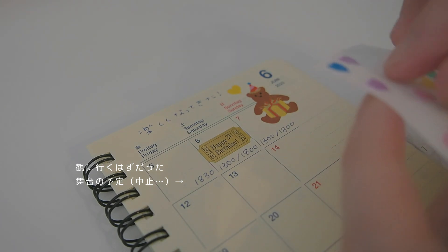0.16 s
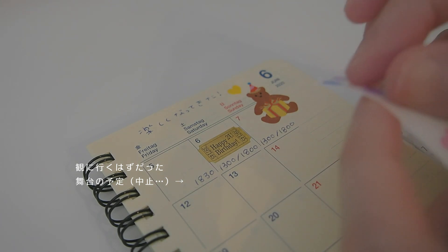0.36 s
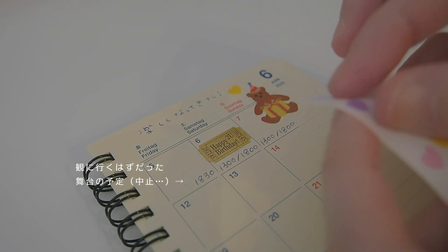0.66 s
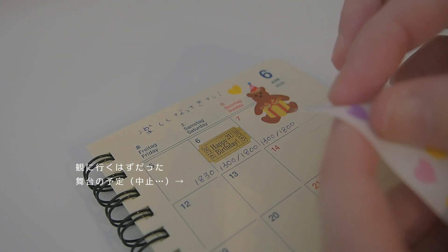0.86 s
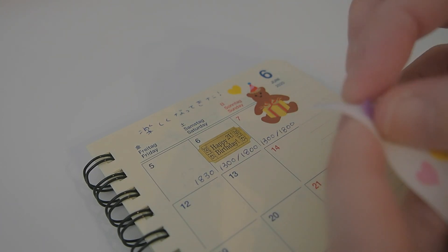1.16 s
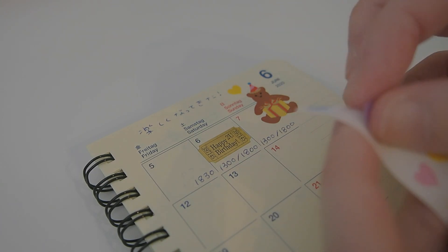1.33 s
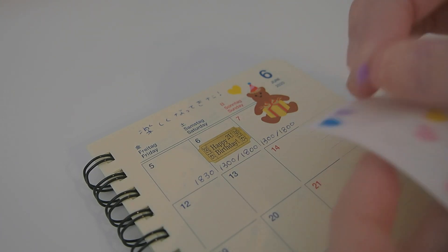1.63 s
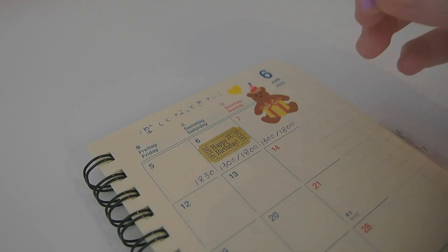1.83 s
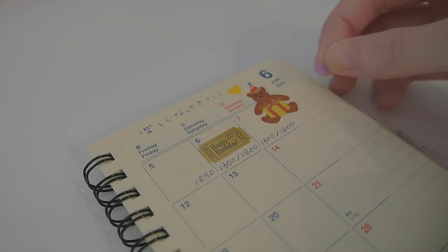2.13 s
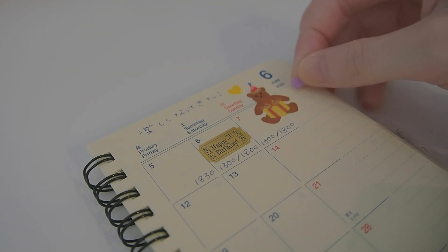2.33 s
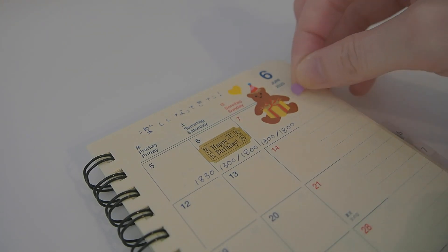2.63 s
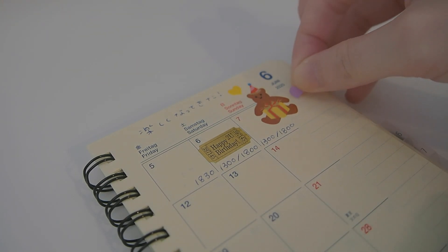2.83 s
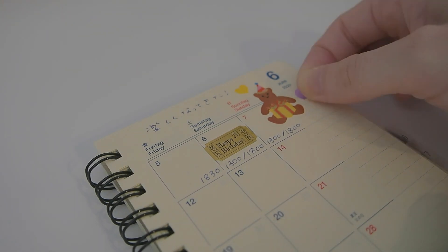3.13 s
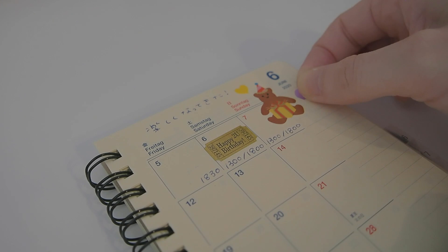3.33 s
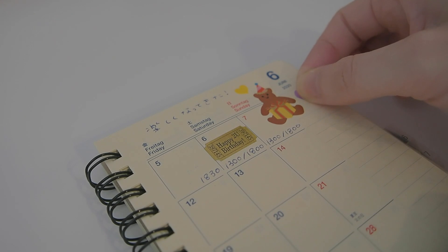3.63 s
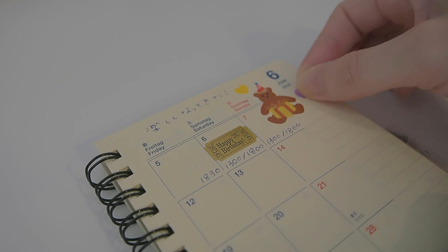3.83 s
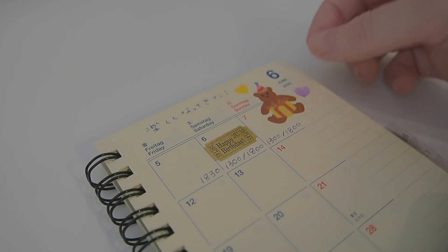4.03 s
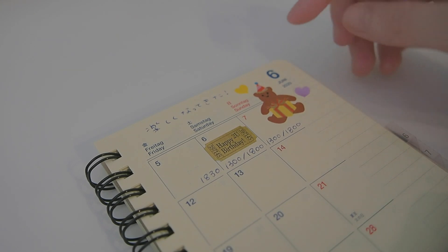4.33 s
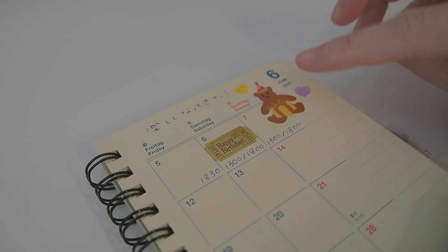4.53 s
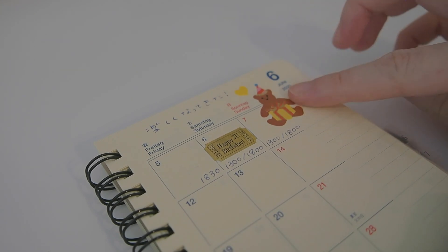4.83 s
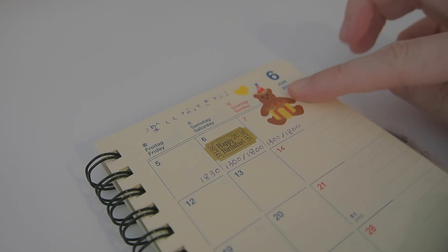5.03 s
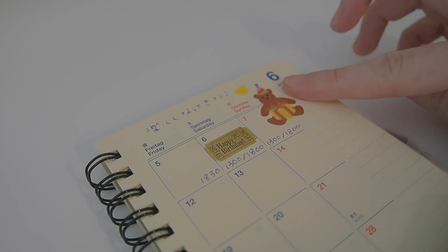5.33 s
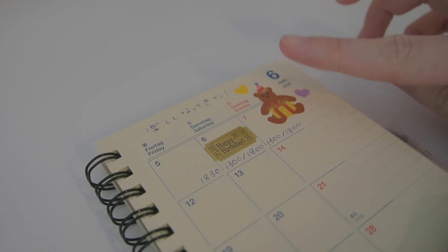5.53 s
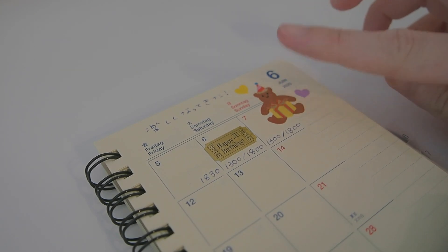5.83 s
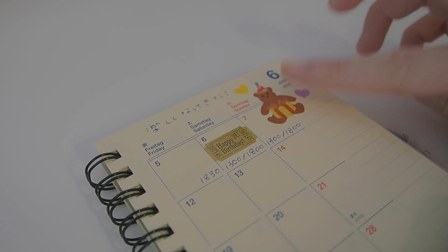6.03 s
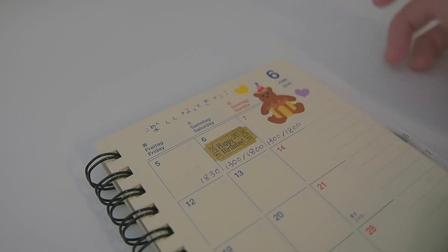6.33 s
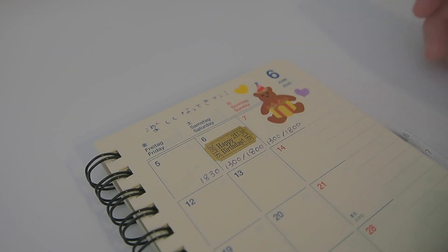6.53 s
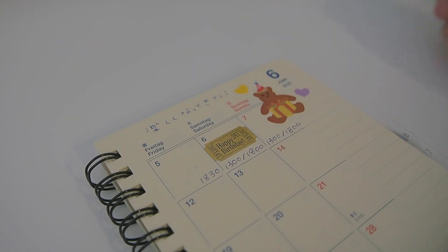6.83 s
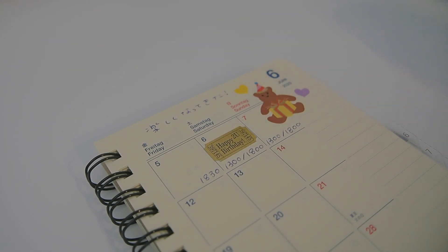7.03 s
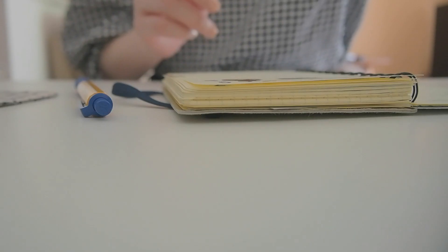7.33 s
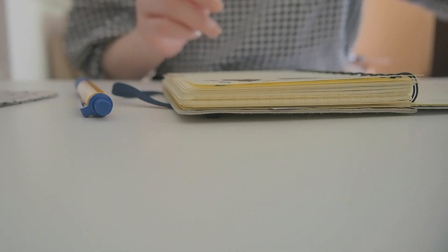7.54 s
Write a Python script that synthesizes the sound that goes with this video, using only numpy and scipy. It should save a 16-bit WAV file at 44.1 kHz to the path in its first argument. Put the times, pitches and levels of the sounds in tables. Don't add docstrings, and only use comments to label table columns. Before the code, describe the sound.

A finger rubs paper over soft desk thuds, a sticker snaps loose with one loud crack, then light page taps and a closing book scrape.

```python
import sys
import numpy as np
from scipy import signal
from scipy.fft import rfft, irfft, next_fast_len
from scipy.io import wavfile
from scipy.ndimage import uniform_filter1d

SR = 44100
rng = np.random.default_rng(int(sys.argv[2]) if len(sys.argv) > 2 else 0)


def ratio(d):
    e = np.asarray(d, float) / 20
    return 10 ** e


def transcribe(signal):
    frames = np.atleast_2d(signal).T
    limited = np.clip(frames, -1, 1)
    pcm = np.round(limited * 32767).astype(np.int16)
    wavfile.write(sys.argv[1], SR, pcm)


N = 338247
M = next_fast_len(N)
HZ = np.fft.rfftfreq(M, 1 / SR)
T = np.arange(N) / SR
TOP_HZ = 15880


def unit(x):
    return x / np.sqrt(np.mean(x ** 2))


def along(table):
    f, v = np.transpose(table)
    return np.interp(np.log(HZ + 1), np.log(f), v)


def shape(x, gain):
    return irfft(rfft(x, M) * gain, M)[..., :N]


def colour(x, table):
    inside = (HZ >= table[0][0]) * (HZ <= min(table[-1][0], TOP_HZ))
    return shape(x, ratio(along(table)) * inside)


def thin(x, hz):
    return signal.sosfilt(signal.butter(2, hz, "high", fs=SR, output="sos"), x)


def grains(rate, spread_db):
    when, size, sign = rng.random(N), rng.exponential(size=N), rng.standard_normal(N)
    return (when < rate / SR) * sign * ratio(spread_db * np.minimum(size, 3.5))


def walk(rate):
    k = int(SR / rate)
    held = np.repeat(rng.standard_normal(N // k + 1), k)
    return 0.69 * uniform_filter1d(held, k)[:N]


def add(out, s, x):
    i = int(s * SR)
    out[..., i:i + x.shape[-1]] += x[..., :N - i]


def arc(start, length, share, rise_db, fall_db):
    times = start + length * np.array([0, np.clip(share, .01, .99), 1])
    return times, np.array([-rise_db, 0, -fall_db])


def moves(rows, form):
    gain = np.zeros(N)
    for start, length, db in rows:
        t, under = arc(start, length, *form)
        gain += np.interp(T, t, ratio(db + under), 0, 0)
    return uniform_filter1d(gain, size=600)


# (frequency [Hz], level [dB])
HISS = [(12, -30), (20, -18), (49, -14.5), (147, -8), (224, -10.5), (428, -14.5), (634, -12.5), (1180, -14),
        (1600, -14.5), (2010, -16), (3140, -18), (4410, -19.5), (6530, -21), (15200, -25.5), (16500, -38)]
# (frequency [Hz], width [Hz], level [dB])
HOUSING = [(144, 22, -2.5), (398, 85, -3.5), (820, 250, -0.5), (1614, 160, 3), (3120, 230, 4),
           (6300, 700, 4)]
# (frequency [Hz], likeness [0-1])
HISS_ALIKE = [(40, 0.95), (130, 0.14), (1500, 0.11), (15000, 0.21)]
# (frequency [Hz], left minus right [dB])
HISS_LEAN = [(60, 3), (300, 1.5), (2000, -0.2), (15000, 5)]


def hiss():
    level_db, sway_db, sways_per_s = -47, 0.13, 2.95
    noise = colour(rng.standard_normal((2, N)), HISS)
    alike = np.clip(along(HISS_ALIKE), 0, .99)
    mid, side = shape(noise, np.sqrt([1 + alike, 1 - alike]))
    housing_db = sum(db * np.exp(-((HZ - hz) / width) ** 2) for hz, width, db in HOUSING)
    lean_db = np.outer([.5, -.5], along(HISS_LEAN))
    pair = shape(np.array([mid + side, mid - side]), ratio(lean_db + housing_db))
    return unit(pair) * ratio(level_db + sway_db * walk(sways_per_s))


# (frequency [Hz], level [dB])
ROOM = [(100, -7.5), (500, -13), (2500, -9.5), (6000, -6.5), (16000, -8)]


def room(x):
    t60_s, tail_db, echo_s, echo_db = 0.11, -13, .0095, -21
    tail = colour(rng.standard_normal((2, N)), ROOM)
    tail = tail * ratio(np.maximum(-60 * T / t60_s, -200)) * np.clip(T / 0.0072, 0, 1)
    tail = ratio(tail_db) * tail / np.sqrt(np.sum(tail ** 2, axis=1, keepdims=True))
    tail[:, int(echo_s * SR)] += ratio(echo_db)
    return shape(x, rfft(tail, M))


# (time [s], level [dB], pitch [Hz])
THUDS = [(0.054, -38, 176), (0.105, -34, 64.6), (0.115, -38, 88.8), (0.13, -24, 150), (0.152, -26, 160),
         (0.637, -38, 147), (1.63, -32.5, 168), (1.759, -40, 154), (2.007, -35, 120), (2.022, -28, 148.4),
         (2.801, -37, 151), (3.07, -50, 167), (4.184, -32, 147), (4.661, -36, 140), (5.119, -38, 161),
         (5.1225, -32, 225), (5.146, -35, 201), (5.158, -36, 210), (5.607, -37, 112), (5.9496, -27, 119),
         (6.369, -37, 230), (6.39, -30, 315), (6.8125, -32, 143), (6.97, -41, 140), (7.195, -30, 151),
         (7.203, -22, 275)]
# (time [s], level [dB], pitch [Hz])
LEANS = [(1.999, -33, 75.4), (2.469, -45, 40.4), (2.48, -42, 70), (2.62, -45, 85), (2.799, -41, 56.5),
         (4.177, -41, 86.1), (4.639, -44, 101), (6.599, -45, 61.9)]


def thuds():
    out, t = np.zeros(N), T[:SR // 2]
    blows = [(s, db, hz, min(18 / hz, 0.12), 0.0034) for s, db, hz in THUDS]
    blows += [(s, db, hz, .29, 0.016) for s, db, hz in LEANS]
    for s, db, hz, t60, soft in blows:
        swing = np.sin(2 * np.pi * hz * t) * ratio(-60 * t / t60)
        add(out, s, ratio(db - 2.0) * (1 - np.exp(-t / soft)) * swing)
    return out


# (start [s], length [s], level [dB])
SCUFFS = [
    (1.65, .12, -64),
    (1.95, 0.14, -66),
    (5.125, .07, -49),
    (7.24, 0.45, -51.5),
]


def shifting():
    book_hz, sharpness = 373, 1.6
    slips = thin(grains(700, 1.7), hz=250)
    scuff = unit(signal.lfilter(*signal.iirpeak(book_hz, sharpness, SR), slips))
    return scuff * moves(SCUFFS, (.1, 1.5, 6))


# (frequency [Hz], level [dB])
RUMBLE = [(15, -50), (25, -45), (81, -5), (109, -11.5), (144, -2), (220, -7.5), (252, -7.5), (296, -11.5),
          (380, -24.5), (490, -58), (840, -120)]
# (frequency [Hz], level [dB])
FLUTTER = [(260, -43), (450, -12), (583, -2.5), (678, -2), (847, 0.5), (985, -7), (1090, -5.5), (1200, -8),
           (1560, -46), (2640, -120)]
# (start [s], length [s], desk rumble level [dB], page flutter level [dB])
DRAGS = [(0.0, 0.038, -40, -49), (0.05, .18, -50, -62), (0.243, 0.099, -62, -53), (0.562, 0.15, -55, -60),
         (1.482, 0.064, -62, -47.5), (1.6, 0.076, -52, -51), (1.665, 0.14, -53, -49.5),
         (1.82, 0.13, -68, -52), (1.94, 0.19, -51.5, -53.5), (2.167, 0.13, -63, -56),
         (2.42, .14, -52.5, -60), (2.792, 0.11, -53, -54), (2.9, .1, -65, -53.5),
         (3.018, 0.094, -61, -50.5), (4.65, 0.09, -59, -65), (5.004, .09, -55.5, -56),
         (5.123, .07, -47, -48.5), (5.19, .09, -61, -53.5), (5.31, 0.094, -58, -54.5), (5.93, .1, -52, -62),
         (6.33, .06, -49, -60), (6.407, .12, -58, -53), (6.8, .1, -54, -50), (7.177, 0.16, -49, -59),
         (7.358, 0.1, -42.5, -47), (7.456, .25, -46, -59)]


def dragging():
    resting_desk_db, resting_page_db, form = -60.5, -65, (0.37, 11, 12.5)
    desk_gain = ratio(resting_desk_db) + moves([(s, length, db) for s, length, db, _ in DRAGS], form)
    page_gain = ratio(resting_page_db) + moves([(s, length, db) for s, length, _, db in DRAGS], form)
    desk = unit(colour(grains(500, 1.3), RUMBLE)) * desk_gain
    page = unit(colour(grains(1500, 1.2), FLUTTER)) * page_gain
    return desk + page


# (frequency [Hz], level [dB])
CRACK = [(590, -36), (1000, -30.5), (1470, -12), (3230, 4), (4330, -13), (6610, -4), (9850, -13),
         (13000, -8.5), (16500, -16)]
# (frequency [Hz], level [dB])
SCATTER = [(120, -14), (200, 9), (487, -3.5), (935, 7), (1750, -4), (2010, -6), (2250, -1.5), (3190, -18),
           (4000, -20), (5200, -15.5), (8800, -120)]
# (time [s], level [dB], ring [Hz], crack re level [dB], dull scatter re level [dB])
TAPS = [(0.641, -39, 900, -16, -14), (1.6325, -27, 862, -7, -7), (2.569, -27.5, 760, -8.5, -24),
        (2.97, -40, 745, -19, -23), (4.659, -36, 830, -14, -15), (5.297, -43, 825, -15, -11),
        (5.6, -27.5, 810, -19, -22), (5.9475, -37, 2300, -8, -20), (5.9483, -24.5, 790, -19, -24),
        (5.957, -35, 850, -20, -20), (6.318, -35.5, 593, -14, -6.5), (6.366, -41, 800, -24, -10),
        (6.388, -30, 540, -32, -22), (6.388, -23, 965, -38, -10), (6.814, -38, 1250, -24, -9),
        (6.8167, -31, 750, -28, -14), (6.8188, -32, 620, -26, -8), (7.193, -16, 840, -27, -20),
        (7.632, -39.5, 729, -15, -11)]


def taps():
    out, t = np.zeros(N), T[:SR // 8]
    crack, scatter = (unit(colour(rng.standard_normal(N), table)) for table in (CRACK, SCATTER))
    crack_fade = ratio(-60 * t / 0.012)
    for s, db, hz, crack_db, scatter_db in TAPS:
        t60 = max(0.025 - .0003 * (db + 35), .008)
        ring = -np.cos(2 * np.pi * hz * t) * ratio(-60 * t / t60) * np.clip(t / 0.0003, 0, 1)
        now = slice(int(s * SR / 2), int(s * SR / 2) + len(t))
        tick = ratio(crack_db + 9.5) * crack[now] * crack_fade
        knock = -np.sin(2 * np.pi * 1.69 * hz * t) * ratio(-60 * t / 0.0092) * np.clip(t / 0.00033, 0, 1)
        dull = ratio(scatter_db + 1.5) * (scatter[now] * ratio(-60 * t / 0.1) + 2.4 * knock)
        add(out, s + 0.001023, ratio(db) * (ring + tick + dull))
    add(out, SNAP[0][0], ratio(-22) * crack[:len(t)] * crack_fade)
    return shape(thin(out, hz=238), HZ < TOP_HZ + 700)


# (start [s], length [s], level [dB], pitch [Hz],
# width [Hz])
CATCHES = [(1.603, .01, -38, 5400, 900), (1.617, .008, -39, 6300, 900), (1.627, .006, -38, 4400, 1500),
           (1.646, .008, -37, 3000, 900), (1.641, .01, -38, 850, 300), (1.657, .01, -41, 3200, 700),
           (1.677, 0.018, -37, 1240, 500), (1.678, .008, -34, 5300, 2000), (1.686, .009, -38, 6000, 1200),
           (1.705, .016, -37, 6200, 2500), (1.703, 0.02, -37, 8750, 2500), (1.723, .011, -32, 8100, 1600),
           (1.726, .012, -38, 5200, 900), (1.738, .012, -37, 6500, 1000), (1.748, .03, -39, 5300, 700),
           (1.75, .02, -40, 7840, 1500), (1.778, 0.041, -43, 6700, 700), (1.79, .04, -45, 5200, 600),
           (1.836, .02, -43, 5300, 700), (1.92, 0.076, -47, 4700, 500), (1.945, 0.055, -47, 5400, 500),
           (1.98, .05, -45, 1140, 250), (2.078, .01, -45, 1230, 700), (2.155, .07, -51, 4900, 500),
           (2.172, 0.048, -43, 1060, 150), (2.267, .015, -46, 2330, 300), (2.267, 0.0297, -44.5, 3200, 350),
           (2.268, 0.013, -46, 3900, 400), (6.318, .005, -43, 3000, 1000), (6.318, .006, -42, 1900, 900),
           (1.8, .025, -42, 6800, 500), (1.812, .016, -43, 5200, 500), (1.87, .03, -44, 5400, 500),
           (1.7, .03, -42, 10500, 1500), (7.117, .02, -50, 6600, 500), (7.116, .012, -49, 2100, 400),
           (7.32, .04, -52, 3100, 300), (7.048, .05, -54, 3070, 300),
           (.176, .015, -48, 4800, 500), (.23, .035, -50, 6500, 600), (.274, .02, -40, 6600, 900),
                (.276, .016, -42, 7600, 600), (.279, .014, -41, 3200, 700), (.294, .022, -39, 6500, 900),
                (.292, .015, -40, 1700, 1500), (.365, .05, -49, 6000, 900), (.368, .05, -48, 2300, 1400),
                (2.815, .09, -52, 750, 200), (2.91, .06, -54, 850, 200), (3.015, .02, -52, 870, 150),
                (3.06, .035, -53, 850, 150), (3.617, .012, -48, 4500, 500), (3.617, .006, -47, 1800, 900),
                (3.642, .012, -48, 1500, 300), (3.65, .008, -49, 3000, 900), (3.733, .012, -46, 3100, 900),
                (3.733, .013, -46, 1600, 600), (3.733, .012, -44, 6600, 3000),
                (5.132, .014, -48, 1200, 500), (5.134, .035, -46, 550, 400), (5.148, .014, -47, 900, 400),
                (5.156, .015, -48, 520, 300), (5.13, .04, -51, 2400, 1200), (6.222, .008, -45, 600, 500),
                (6.389, .012, -48, 3200, 600), (6.405, .015, -41, 1000, 600), (6.72, .03, -50, 3150, 300),
                (6.763, .008, -47, 3200, 1000), (6.818, .006, -45, 1800, 600), (6.823, .014, -41, 900, 350),
                (7.212, .006, -38, 800, 400), (.47, .12, -53, 6350, 300), (.725, .08, -51, 5600, 600),
                (.725, .05, -53, 4100, 400)]
# (start [s], length [s], level [dB], pitch [Hz], width [Hz])
SCRAPE_CATCHES = [(7.388, .022, -32.5, 1950, 300), (7.412, .012, -37, 2160, 350),
                  (7.423, .016, -35, 2000, 400), (7.438, .012, -35, 1900, 500),
                  (7.452, .014, -31.5, 1950, 350), (7.39, .06, -43, 1250, 400),
                  (7.466, .03, -45, 1950, 400), (7.408, .022, -37, 4160, 500), (7.432, .02, -37, 3900, 600),
                  (7.409, .017, -37, 6500, 700), (7.427, .027, -34.5, 6500, 600),
                  (7.41, .035, -39, 9200, 800), (7.408, .02, -44, 11500, 500),
                  (7.417, .028, -43, 12500, 250), (7.422, .022, -45, 14500, 300),
                  (7.443, .016, -36.5, 5800, 1200), (7.415, .03, -40, 5200, 500),
                  (7.375, .035, -46, 6800, 1200), (7.457, .045, -47, 6500, 800),
                  (7.424, .02, -40, 8200, 900)]


def catches(slips):
    out = np.zeros(N)
    slips = np.sign(slips) * np.abs(slips) ** .25
    for start, length, db, hz, width in CATCHES + SCRAPE_CATCHES:
        now = slice(int(start * SR), int((start + length + 0.0034) * SR))
        ring = signal.iirpeak(hz, hz / (1.32 * width), SR)
        once = signal.lfilter(*ring, slips[now.start - 2000:now.stop])
        sung = signal.lfilter(*ring, once)[2000:]
        s, under = arc(start, length, .2, 5, 8.3)
        t = T[now]
        edge = np.clip(np.minimum((t - start) / .0008, (s[-1] + .003 - t) / .003), 0, 1)
        out[now] += unit(sung) * ratio(db + np.interp(t, s, under)) * edge
    return out


# (time [s], level [dB], brightness [dB])
DRAW = [(1.675, -40, 0), (1.7, -39.5, 0), (1.712, -40, 5.5), (1.818, -44, 5), (1.915, -45.5, -3.5),
        (1.98, -44.5, 0.5), (2.11, -50, 2.5), (2.19, -49.5, 3.5), (2.25, -54, 5), (2.295, -57, 3)]
# (start [s], length [s], level [dB], brightness [dB], hollow ring [Hz])
PICKS = [
    (0.36, .13, -48, 0, 2980),
    (0.722, .25, -47.5, 1.5, 2720),
    (0.998, 0.21, -47, 2, 2750),
]
RUBS = [(0.0, 0.088, -47, -5, 1600), (1.545, 0.11, -42, -10, 3000), (1.638, 0.042, -35.5, -4, 3100),
        (4.188, 0.066, -46, -8, 6400), (4.69, .2, -49.5, -8, 3060), (5.128, .1, -49, -20, 3000),
        (5.32, .08, -55, -14, 1500), (6.322, .05, -49, -8, 3100), (6.43, 0.1, -45.5, -11, 1410),
        (6.835, .1, -53, -9, 1630), (7.462, 0.12, -47, -4.5, 1960)]
BRUSHES = [(0.08, .12, -50, -6, 1600), (0.15, 0.063, -51, 2, 4600), (0.21, 0.056, -53, 5, 6300),
           (0.262, .058, -38.5, 1, 3060), (0.42, 0.29, -54, 5, 6300), (2.255, 0.044, -50, 5, 3100),
           (3.58, 0.12, -49, -11, 4360), (3.729, 0.021, -42.5, 1, 3000), (5.0, .07, -52.5, -8, 3100),
           (6.5, 0.077, -47, -2, 1410), (6.64, .1, -54.5, 1.5, 3150), (6.98, 0.045, -54, 2, 3100),
           (7.025, .03, -51, 2, 4500), (7.06, 0.05, -53, 4, 3100), (7.112, 0.029, -48, 2, 5200)]
SLIDES = [
    (1.335, 0.08, -45.5, 0, 2900),
    (1.592, 0.042, -42, 3, 3000),
    (6.2, 0.11, -51.5, -6, 1500),
    (6.72, 0.081, -48, -1.5, 3150),
    (7.27, .11, -50, -7, 3070),
]
SCRAPES = [
    (7.383, .083, -34.5, 0, 1980),
]
# (peak at share of length 0-1, rise dB, fall dB, hollow ring dB, dB duller per dB under the peak)
PICK, RUB, BRUSH = (0.18, 4, 11, -1, 0.75), (.08, 7, 13.5, -6.5, -0.2), (0.62, 14, 15, -5.5, .1)
SLIDE, SCRAPE = (1.5, 7.5, 2.5, -5, 0.6), (0.5, 8.5, 5, 0, 1.5)


def strokes():
    yield (*np.transpose(DRAW), 5250, -8)
    for rows, form in ((PICKS, PICK), (RUBS, RUB), (BRUSHES, BRUSH), (SLIDES, SLIDE), (SCRAPES, SCRAPE)):
        *curve, hollow_db, duller = form
        for start, length, db, bright_db, hz in rows:
            s, under = arc(start, length, *curve)
            yield s, db + under, bright_db + duller * under, hz, hollow_db


# (frequency [Hz], level [dB])
BODY = [(530, -32), (900, -3), (1200, 1.5), (1330, -3), (1600, 3.5), (1690, -5), (1910, 1), (2830, -3.5),
        (3160, -1), (4600, -11.5), (5980, -62), (10100, -120)]
# (frequency [Hz], level [dB])
SHEEN = [(2350, -13), (4000, -5), (5310, 1), (5780, 0), (6360, 3.5), (7030, 0.5), (10000, -10),
         (13000, -23), (22000, -120)]
# (frequency [Hz], level [dB])
FINE = [(5290, -27), (9000, 6), (14800, 4.5), (15800, -10), (16300, -59), (16400, -33), (16500, -62)]
# (start [s], length [s], level [dB])
WISPS = [(0.105, .1, -53), (.37, .05, -54), (1.375, .045, -56), (1.7, 0.056, -51), (1.76, .12, -47.5),
         (1.88, 0.071, -54), (1.95, 0.098, -45.5), (2.055, 0.066, -50), (2.12, 0.15, -52), (2.4, 0.18, -59),
         (4.185, .055, -49), (4.7, .06, -57), (6.69, .04, -58), (6.76, 0.06, -54), (7.0, .04, -59),
         (7.398, .04, -44), (7.41, 0.038, -48), (7.428, 0.03, -47), (7.44, .018, -45)]


def rubbing():
    body, sheen, fine = (unit(colour(grains(7000, 1.2), table) * ratio(2.44 * walk(70)))
                         for table in (BODY, SHEEN, FINE))
    slips = grains(6000, 3)
    out = fine * moves(WISPS, (0.27, 9, 10))
    for s, body_db, sheen_db, hz, hollow_db in strokes():
        now = slice(max(int((s[0] - .006) * SR), 0), int((s[-1] + 0.0071) * SR))
        t = T[now]
        fade = np.clip(np.minimum(t - s[0], s[-1] - t) / 0.0068 + 1, 0, 1)
        hollow = unit(signal.lfilter(*signal.iirpeak(hz, 9.8, SR), slips[now]))
        mix = (body[now] + ratio(hollow_db) * hollow) / np.hypot(1, ratio(hollow_db))
        bright = np.interp(t, s, sheen_db)
        mix += ratio(bright) * sheen[now]
        mix += ratio(-9.5 + .7 * bright) * fine[now]
        out[now] += fade * ratio(np.interp(t, s, body_db)) * mix
    return shape(out + catches(slips[::-1]), HZ < TOP_HZ)


# (start [s], level [dB], pitch [Hz], length [s])
SNAP = [
    (1.49333, 1.3, 2150, 0.0007),
    (1.49478, -14, 2100, 0.0009),
    (1.49339, -13.5, 4150, 0.0007),
    (1.4943, -17, 4500, 0.0009),
    (1.502, -28, 1550, .0035),
    (1.4975, -28, 2800, .002),
    (1.633, -16, 2900, .0009),
    (1.63285, -13, 900, .0007),
    (1.6342, -24, 2400, .001),
]


def snap():
    out, t = np.zeros(N), T[:SR // 50]
    rise = np.sin(np.pi / 2 * np.clip(t / 0.00015, 0, 1)) ** 2
    for s, db, hz, length in SNAP:
        caught = np.exp(-(t / length) ** 3)
        add(out, s, ratio(db) * np.sin(2 * np.pi * hz * t) * caught * rise)
    return thin(thin(out, hz=590)[::-1], hz=590)[::-1]


# (frequency [Hz], left minus right [dB])
SHADOW = [(300, -1), (2400, 1), (4400, 5), (9000, 11), (15000, 14)]
# (frequency [Hz], phase lag between the ports [radians])
CREEP = [(700, -.1), (2500, 0), (4500, .5), (7200, 1.4), (9000, 2.2), (11500, 3.3), (15000, 4.9)]
# (frequency [Hz], spread [radians]), and how far apart [Hz] it varies
SCATTERED, SCATTERED_HZ = [(2000, 0), (4000, .3), (7000, .9), (15000, 1.5)], 450


def ports(x, creep):
    k = int(SCATTERED_HZ / HZ[1])
    wander = uniform_filter1d(uniform_filter1d(rng.standard_normal(len(HZ)), k), k)
    edges = unit(wander) * along(SCATTERED)
    turn = np.exp(1j * np.array([0 * HZ, creep * along(CREEP) + edges]))
    return shape(x, ratio(np.outer([.5, -.5], along(SHADOW))) * turn)


def scene():
    moved_s, moved_creep, left_knock_db = 7.16, 1.9, 3.5
    rubs = rubbing() + dragging() + shifting() + snap()
    knocks = thuds() + taps()
    moved = T > moved_s
    near = rubs + knocks
    late_knocks = ratio(np.array([[.5], [-.5]]) * left_knock_db) * knocks * moved
    late = ports(rubs * moved, moved_creep) + late_knocks
    return ports(near * ~moved, 1.0) + late + room(near) + hiss()


def top_cut(x):
    return signal.sosfilt(signal.butter(12, 15880, fs=SR, output="sos"), x)


def record(dry):
    offset = -0.0015
    mix = np.clip(dry + offset, -1, 1)
    return top_cut(mix)


dry = scene()
out = record(dry)
transcribe(out)
```